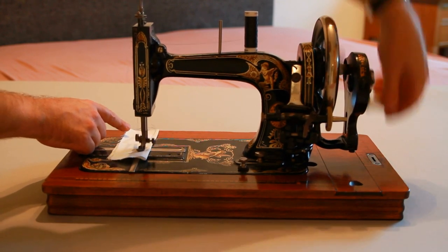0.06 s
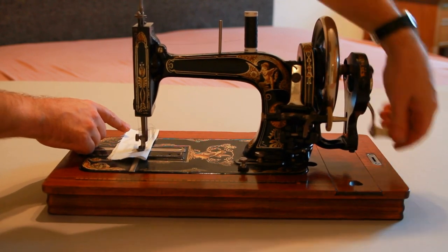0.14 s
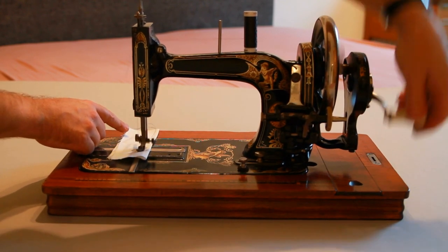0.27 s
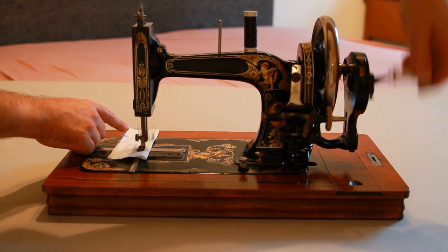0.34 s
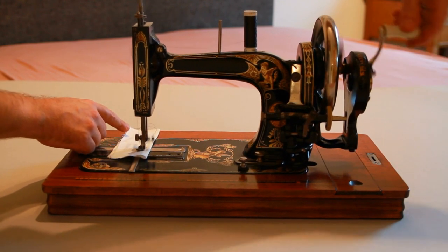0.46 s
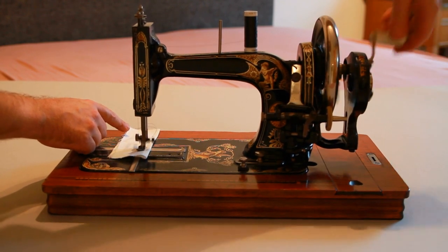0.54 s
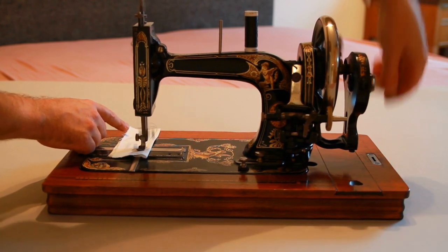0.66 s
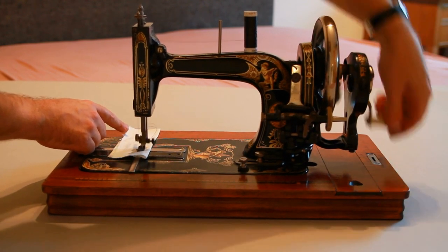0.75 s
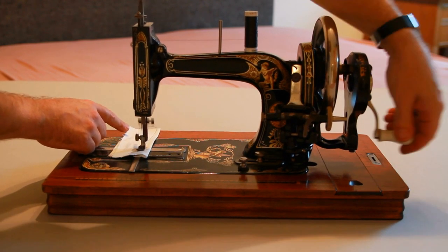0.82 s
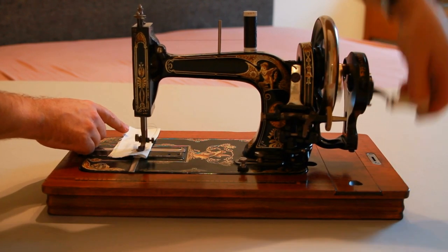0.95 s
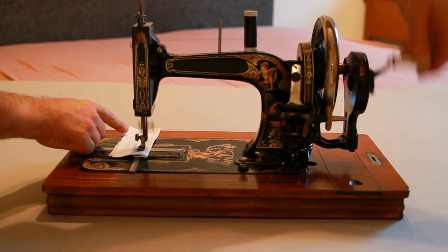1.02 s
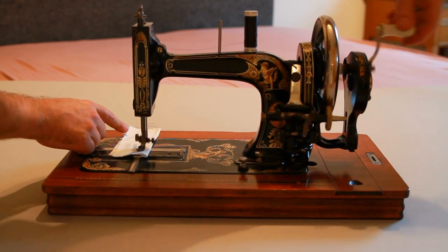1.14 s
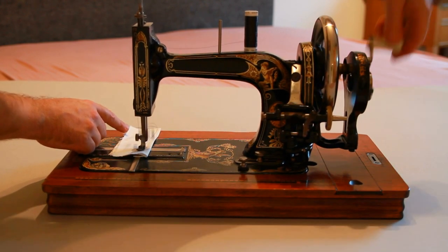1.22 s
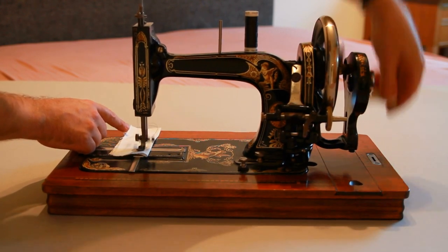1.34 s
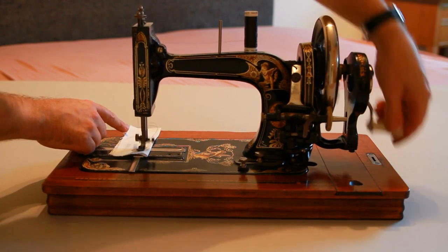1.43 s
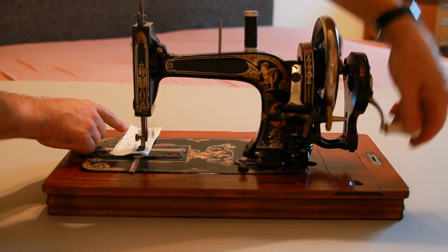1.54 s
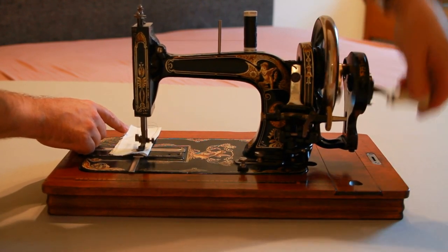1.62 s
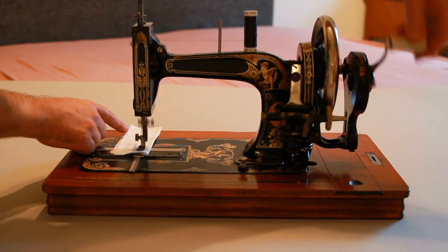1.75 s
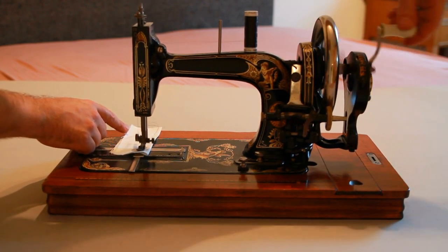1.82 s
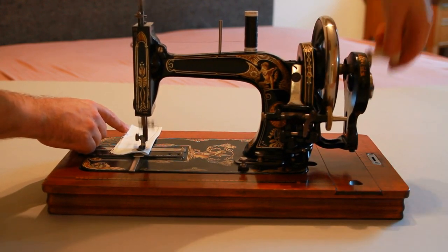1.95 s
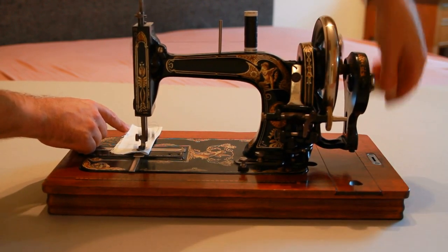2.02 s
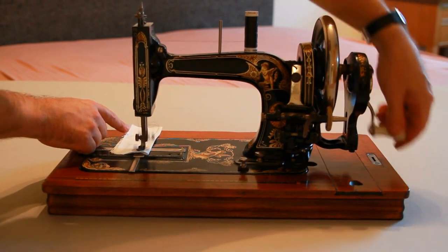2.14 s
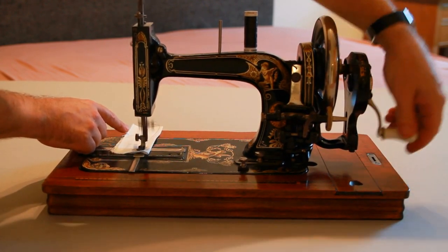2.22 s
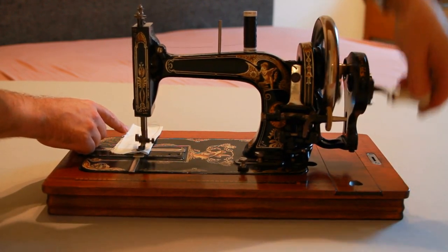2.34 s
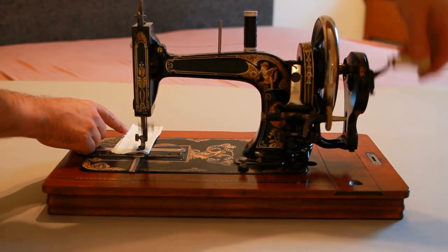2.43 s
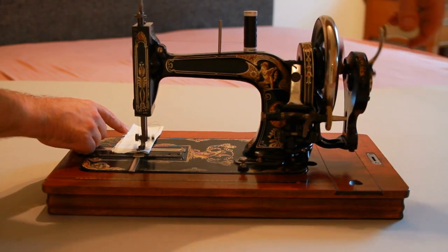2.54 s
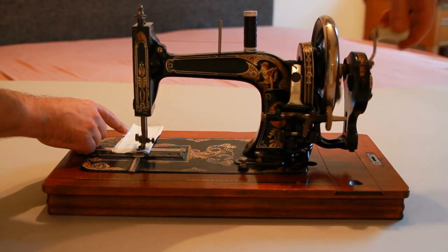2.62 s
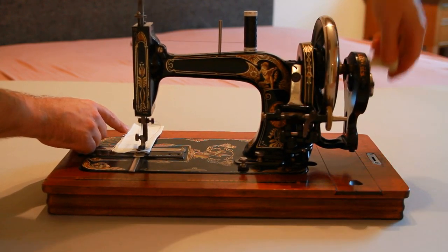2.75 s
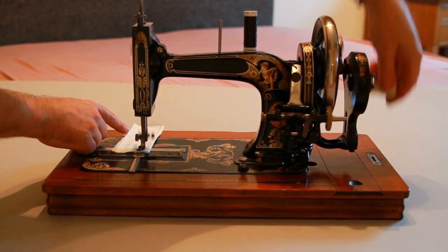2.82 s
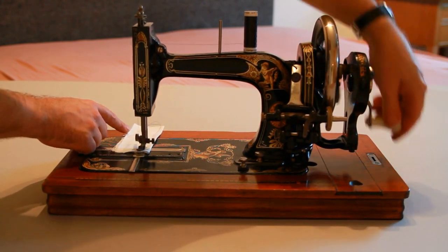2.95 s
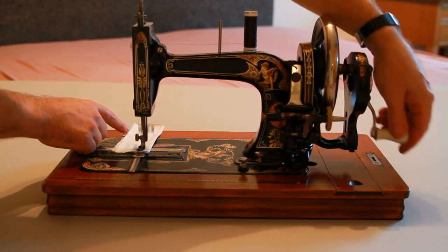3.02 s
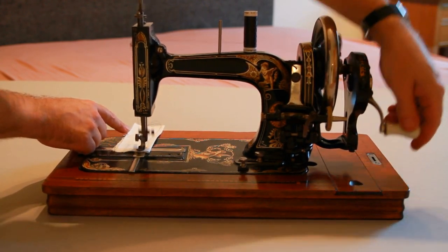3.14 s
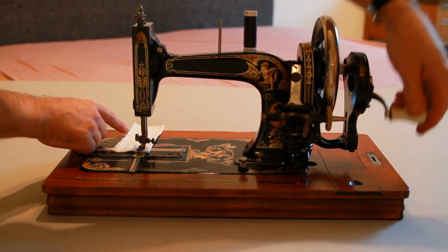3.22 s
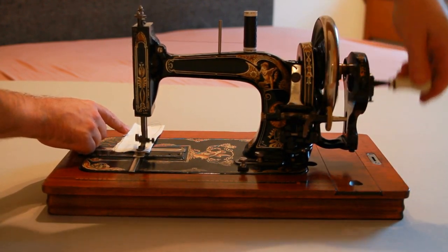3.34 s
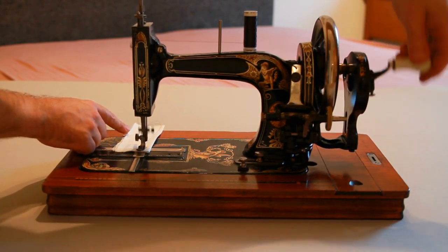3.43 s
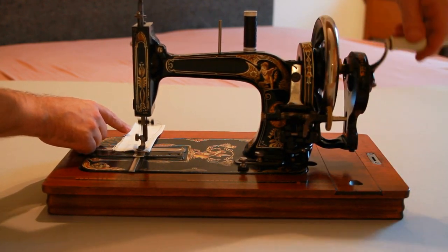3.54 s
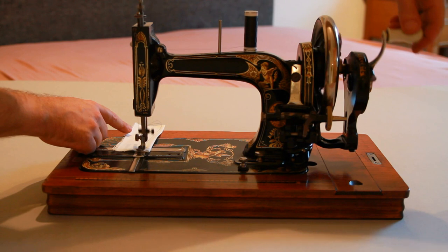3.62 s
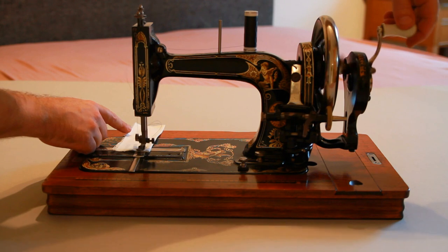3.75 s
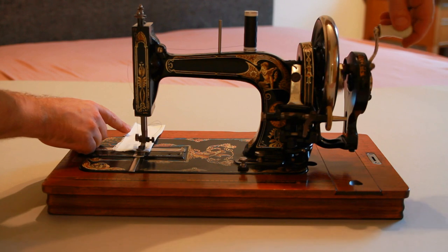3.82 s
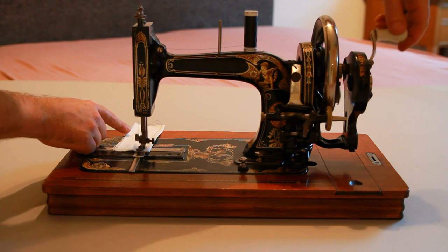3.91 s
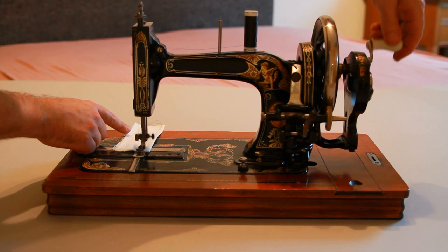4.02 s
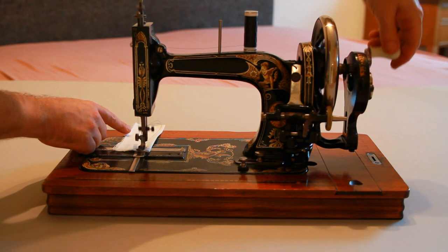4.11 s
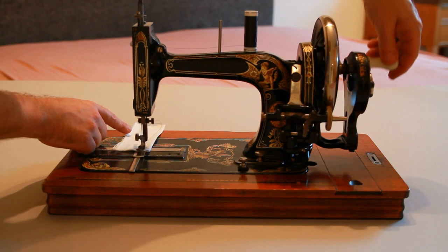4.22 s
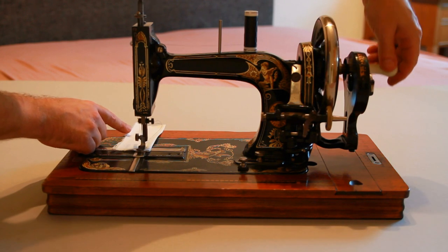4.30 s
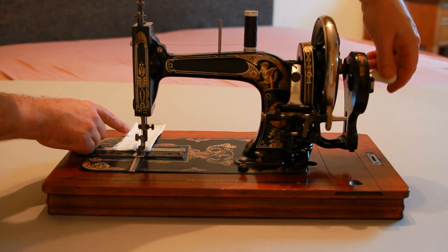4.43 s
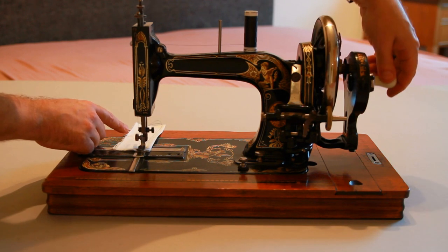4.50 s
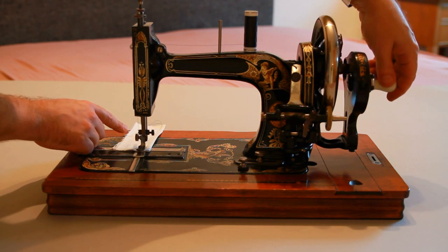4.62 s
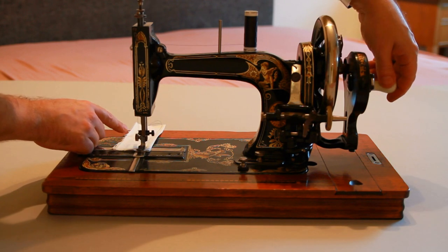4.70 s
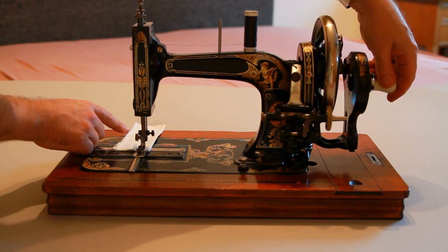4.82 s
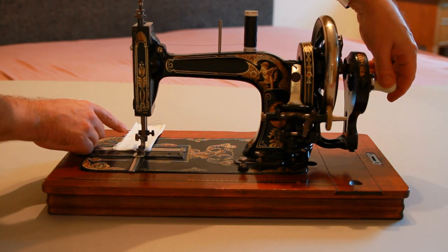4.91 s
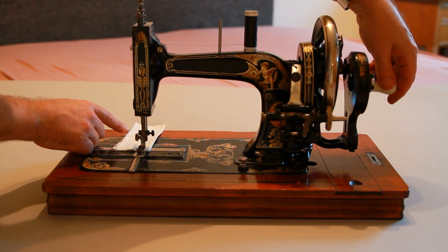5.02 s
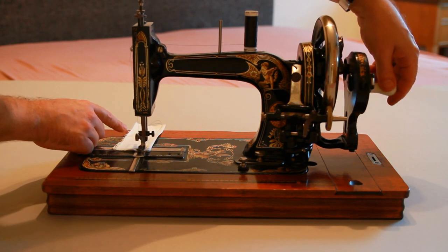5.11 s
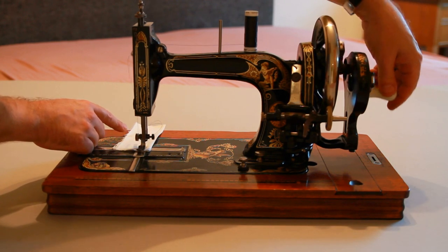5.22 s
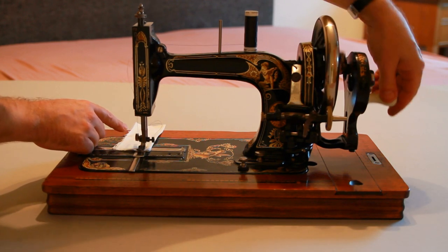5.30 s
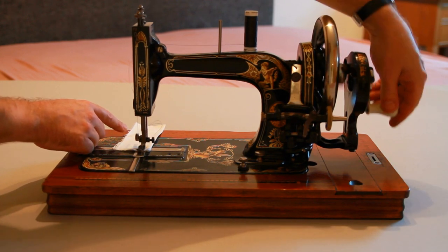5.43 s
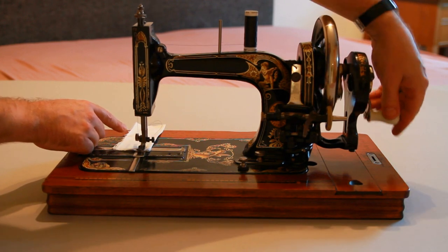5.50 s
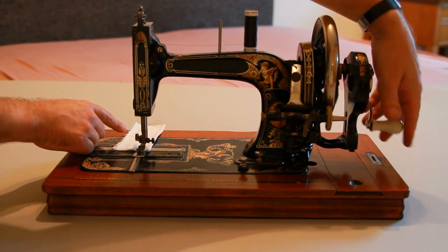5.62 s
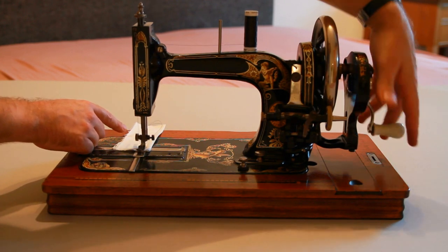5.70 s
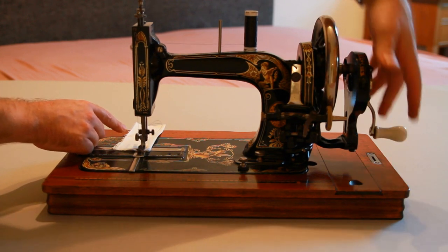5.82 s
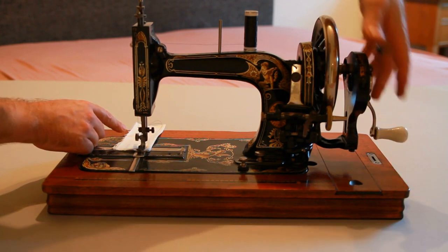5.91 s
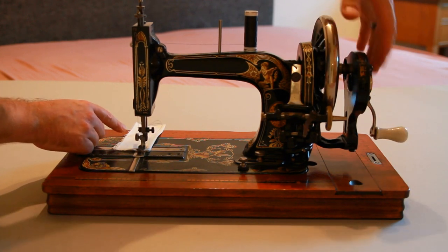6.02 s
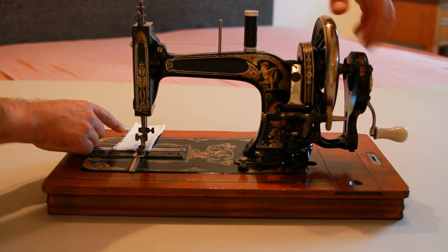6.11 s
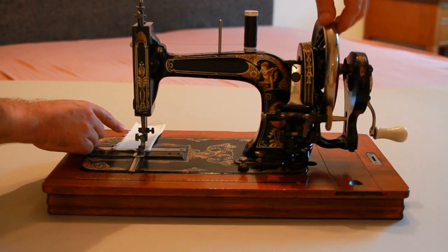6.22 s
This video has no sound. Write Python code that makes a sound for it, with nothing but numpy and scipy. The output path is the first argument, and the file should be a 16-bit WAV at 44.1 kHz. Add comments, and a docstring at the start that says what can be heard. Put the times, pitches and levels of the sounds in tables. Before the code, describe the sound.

From the start, a hand-cranked iron sewing machine stitches at about four to five stitches a second. Each stitch has a light, springy double tick, then a quick cluster of bright, rattling steel clacks. Underneath, the gears rumble and grind through the wooden base, swelling with each turn. From about 2.4 seconds the stitches slow and soften, with the last full one near 3.4 seconds. The wheel coasts with a very faint whirr, and a weaker cluster of clacks and a knock comes around 4 seconds. Separate dull knocks with hollow thuds follow near 4.4 and 5 seconds. Between 5.4 and 5.9 seconds the crank is handled with several small steel clicks and knocks, and a last soft thud comes at 6 seconds. The machine sounds close, in a small furnished room with little echo and a faint steady hiss and hum.

```python
"""In a small furnished room, a hand-cranked iron sewing machine stitches cloth, slows and stops.
Each stitch brings two small ticks of the springy thread guide, then bright steel clacks of the needle
bar and the shuttle (the thread carrier under the cloth). The gears rumble through the wooden base.
Afterwards a hand folds the crank away with a few knocks, over a faint hiss and hum."""
import sys
import numpy as np
from scipy import signal
from scipy.io import wavfile
from scipy.ndimage import uniform_filter1d

SR = 44100
rng = np.random.default_rng(int(sys.argv[2]) if len(sys.argv) > 2 else 0)


def master(y):
    """Save y as 16-bit WAV."""
    cut = np.clip(np.atleast_2d(y).T, -1, 1)
    pcm = np.round(cut * 32767)  # scale
    wavfile.write(sys.argv[1], SR, pcm.astype(np.int16))


N = 276066


def amp(db):
    """Turn decibels (dB) into a number to multiply by."""
    return 10 ** (np.asarray(db) / 20)

def rms_one(x):
    """Scale a sound to an average strength (rms) of 1."""
    return x / np.sqrt(np.mean(x ** 2) + 1e-20)

def even(x):
    """Hold the strength at 1 over every 3 ms, so that like blows come out alike."""
    return x / np.sqrt(uniform_filter1d(x ** 2, size=130) + 1e-12)

def in_time(rows):
    """Join rows of (seconds, values) with straight lines: one curve for each value."""
    times, *columns = np.transpose(rows)
    return [np.interp(np.arange(N) / SR, times, column) for column in columns]

def wander(points):
    """A slow curve through a number of random values."""
    return np.interp(np.arange(N), np.linspace(0, N, points), rng.standard_normal(points))

def at_hz(rows, hz):
    """Read a table at any pitch, between its rows."""
    pitches, values = np.transpose(rows)
    return np.interp(np.log(hz), np.log(pitches), values)

def keep_side(x, side, hz):
    """Keep the "low" or "high" part of a sound, split at hz."""
    return signal.sosfilt(signal.butter(2, hz, side, fs=SR, output="sos"), x)

def bands(low_hz):
    """Filters a third of an octave wide, from low_hz up, each with its middle pitch."""
    edges = low_hz * 2 ** np.arange(0, np.log2(19000 / low_hz), 1 / 3)
    return [(np.sqrt(low * high), signal.butter(2, [low, high], "band", fs=SR, output="sos"))
            for low, high in zip(edges, edges[1:])]

def coloured(pair, spectrum, low_hz):
    """Give each band its level from a table; two unrelated noises take turns filling the bands."""
    return sum(amp(at_hz(spectrum, hz)) * signal.sosfilt(band, pair[k % 2])
               for k, (hz, band) in enumerate(bands(low_hz)))

def resonate(x, hz, width_hz):
    """A resonance: it favours one pitch, and rings longer the narrower it is."""
    r = np.exp(-np.pi * width_hz / SR)
    feedback = [1, -2 * r * np.cos(2 * np.pi * hz / SR), r * r]
    return signal.lfilter(np.array([1, 0, -1]) * (1 - r * r) / 2, feedback, x)

def focus(x, hz, width_hz):
    """The same resonance twice, leaving less sound around its pitch."""
    return resonate(resonate(x, hz, width_hz), hz, width_hz)

def body(force, resonances):
    """A shaken object sounds through all its resonances."""
    return sum((-1) ** k * amp(db) * resonate(force, hz, width)
               for k, (hz, width, db) in enumerate(resonances))

def grains(per_s, uneven_db):
    """Two streams of tiny random contacts of uneven size."""
    sizes = amp(uneven_db * np.minimum(rng.exponential(1, (2, N)), 4)) * rng.choice([-1, 1], (2, N))
    return sizes * (rng.random((2, N)) < per_s / SR) + 1e-18

def struck(times, level_db, tones, spread_db):
    """Every blow rings all the tones of a part, each with a slightly random strength."""
    starts, out = np.round(times * SR).astype(int), np.zeros(N)
    chance = rng.standard_normal((len(starts), len(tones)))
    for k, (hz, tone_db, fade_s) in enumerate(tones):
        clicks = np.full(N, 1e-18)
        clicks[starts] += amp(level_db + tone_db + spread_db * chance[:, k])
        decay, angle = amp(-60 / (fade_s * SR)), 2 * np.pi * hz / SR
        out += signal.lfilter([0, np.sin(angle)], [1, -2 * decay * np.cos(angle), decay ** 2], clicks)
    return out

def bursts(times, level_db, length_s, rise_s=0.0008):
    """Loudness curve of contacts that rise fast, hold and break off: 20 dB down after length_s."""
    out = np.zeros(N)
    for start, db in zip(times, level_db):
        i = round(start * SR)
        t = np.arange(min(N - i, SR // 10)) / SR
        out[i:i + len(t)] += amp(db - 20 * (t / length_s) ** 4) * np.minimum(t / rise_s, 1)
    return out


# The room's hiss. Each row: pitch in Hz, level in dB.
HISS_COLOUR = [(120, -31), (200, 4), (240, -26), (305, -6), (465, -38), (491, -6), (548, -8), (791, -2.5),
               (1040, -16.5), (1210, -23), (3250, -19.5), (6520, -20.5), (16000, -26)]
# The room's hum. Each row: pitch in Hz, width in Hz, level in dB.
HUM_BANDS = [(45, 33, -83), (101.6, 3.7, -73), (130, 48, -74), (644, 39, -62), (720, 41, -62),
             (788, 53, -63.5), (918, 71, -61.5)]

def room_noise():
    """A steady hiss with narrow bands of humming noise."""
    hiss = amp(-58.5) * rms_one(coloured(rng.standard_normal((2, N)), HISS_COLOUR, low_hz=151.5))
    noise = rng.standard_normal(N)
    return hiss + sum(amp(db) * rms_one(focus(noise, hz, width)) for hz, width, db in HUM_BANDS)


# Swells of a low tone. Each row: start in seconds, length in seconds, level in dB, pitch in Hz.
SWELLS = [(3.598, 0.094, -58, 172), (3.77, .14, -54, 167.5), (4.07, 0.14, -55, 165),
          (4.23, 0.16, -58.5, 169.8), (4.46, 0.15, -55, 168), (4.664, 0.26, -56, 167.7),
          (5.054, .2, -60.5, 175.6), (5.69, .33, -58.5, 184.6), (6.072, .3, -56.5, 177.7)]

def low_tone(fade_s=0.031, waver=0.0131):
    """A faint tone fades in, wavers in pitch and loudness, and fades out again."""
    t = np.arange(N) / SR
    starts, _, _, pitches = np.transpose(SWELLS)
    hz = np.interp(t, starts, pitches) * (1 + waver * wander(50))
    tone = np.sqrt(2) * np.sin(2 * np.pi * np.cumsum(hz) / SR) * amp(2 * wander(120))
    return tone * sum(amp(db) * np.clip(np.minimum(t - start, start + length - t) / fade_s, 0, 1)
                      for start, length, db, _ in SWELLS)


# How long the room echoes. Each row: pitch in Hz, seconds to fade by 60 dB.
ECHO_FADES = [(300, 0.35), (1500, 0.21), (4000, 0.27), (10000, 0.19), (16000, 0.13)]

def room_echo(x, gap_s=0.0022, level_db=-33):
    """Many reflections blend into noise that dies away, the highest pitches first."""
    noise, out, lag = rng.standard_normal((2, N)), np.zeros(N), round(gap_s * SR)
    for k, (hz, band) in enumerate(bands(153.5)):
        decay = amp(-120 / (at_hz(ECHO_FADES, hz) * SR))
        energy = signal.lfilter([1], [1, -decay], signal.sosfilt(band, x) ** 2 + 1e-18)
        tail = np.sqrt(energy) * rms_one(signal.sosfilt(band, noise[k % 2]))
        out[lag:] += tail[:N - lag]
    return amp(level_db) * out


# The coasting wheel. Each row: time in seconds, level in dB.
COASTING = [(3.45, -80), (3.6, -62), (3.8, -65), (4.3, -65), (4.5, -80)]

def wheel_whirr():
    """The wheel rubs faintly while it coasts."""
    rubbing = grains(per_s=1500, uneven_db=3)[0]
    return amp(in_time(COASTING)[0]) * rms_one(focus(rubbing, hz=1760, width_hz=200))


# Gears and shafts turning. Each row: time in seconds, rumble in dB, grind in dB.
TURNING = [(0, -32, -38.5), (.9, -34.5, -41.5), (1.3, -36.5, -43), (2.2, -33.5, -42), (2.7, -39, -45.5),
           (3.05, -36.5, -46.5), (3.45, -41, -49.5), (3.6, -47.5, -51), (3.75, -50, -58),
           (4.05, -40.5, -60), (4.25, -59, -61.5), (4.6, -63.5, -64.5), (5.32, -60, -61.5),
           (5.42, -57, -71), (5.6, -42, -57.5), (5.78, -58.5, -54.5), (5.86, -68, -73), (6.26, -57, -63.5)]

def gear_effort(swing_db=2, heaviest_at=0.24, shudder_fade_s=0.21):
    """Strength of rumble and grind: the load swings once a stitch, and knocks leave the gears shaking."""
    rumble_db, grind_db = in_time(TURNING)
    stitch_starts = [-0.12] + [start for start, _ in GUIDE_FLICKS]
    stitch_count, = in_time([(start, k) for k, start in enumerate(stitch_starts)])
    load_db = swing_db * np.cos(2 * np.pi * (stitch_count - heaviest_at))
    knock_times, _, _, thud_db, _ = np.transpose(CRANK_KNOCKS)
    kicks = np.full(N, 1e-18)
    kicks[(knock_times * SR).astype(int)] = amp(thud_db)
    shudder = signal.lfilter([1], [1, -amp(-60 / (shudder_fade_s * SR))], kicks)
    shudder = signal.lfilter(np.hanning(400) / 200, [1], shudder)   # builds over 9 ms
    return amp(rumble_db + load_db) + amp(-13.5) * shudder, amp(grind_db + load_db) + amp(-22) * shudder


# Resonances of the wooden base and the iron arm. Each row: pitch in Hz, width in Hz, level in dB.
WOODEN_BASE = [(121.6, 17.7, -11.5), (167, 53, -10.5), (217.8, 11.7, 0), (265.3, 9.1, 2), (297.8, 14.3, 4),
               (319.4, 33.6, 3), (355.3, 32.4, -0.5), (386, 36, -7), (452, 22.4, -3), (586.7, 60, -8),
               (717.6, 18.3, -7.5), (780, 15, -7.5)]
IRON_ARM = [(951, 91, -4.5), (1216, 89, -2), (1460, 210, -1.5), (1853, 260, -1), (2127, 350, -5.5)]
# The grinding of the gear teeth. Each row: pitch in Hz, level in dB.
GRIND_COLOUR = [(410, -28), (700, -18), (988, 0.5), (1200, 2), (3360, -7), (9350, -17.5), (10400, -18),
                (12000, -13), (15600, -22), (22000, -120)]

def gears():
    """Gear teeth meet unevenly, rasping in the iron arm and shaking the base and the table under it."""
    rumble_gain, grind_gain = gear_effort()
    jolts = grains(per_s=500, uneven_db=3)[0]
    rumble = rms_one(keep_side(body(jolts, WOODEN_BASE), "high", 90))
    teeth = grains(per_s=1500, uneven_db=3)
    grind = rms_one(coloured(teeth, GRIND_COLOUR, low_hz=624)) + rms_one(body(teeth[0], IRON_ARM))
    table_thrum = amp(-42.5) * rms_one(resonate(rng.standard_normal(N), 47.1, 60))
    table_shake = rms_one(resonate(resonate(teeth[1], 105, 44), 117, 88))
    shake_gain = amp(-54) * (rumble_gain / amp(-34)) ** 1.5   # grows faster than the rumble
    return rumble_gain * (rumble + table_thrum) + grind_gain * rms_one(grind) + shake_gain * table_shake


# Knocks of crank and handle. Each row: start in seconds, level in dB, pitch in Hz,
# thud level in dB, thud pitch in Hz.
CRANK_KNOCKS = [(3.234, -42, 1430, -48, 303), (3.6128, -40.5, 2920, -37.5, 310),
                (3.775, -63, 1410, -42, 300), (3.8121, -39, 1440, -46, 332), (4.028, -27, 2290, -34, 243),
                (4.2119, -51, 1710, -37.5, 344), (4.3919, -33.5, 1920, -31.5, 442),
                (4.4933, -56, 1420, -40, 310), (4.9832, -37.5, 1850, -35.5, 605),
                (5.3851, -50, 1400, -37.5, 314), (5.438, -46, 1400, -44, 255), (5.509, -59, 1420, -45, 320),
                (5.665, -38, 1140, -33, 336), (5.7254, -27.5, 2310, -42, 330),
                (5.7813, -43, 1580, -46, 616), (5.8865, -63, 1820, -34, 285),
                (6.0034, -59, 1170, -35.5, 320)]

def crank_knocks(ring_db=-10.5, ring_fade_s=0.087):
    """Each dull blow is a puff of noise with a brief ring, and a hollow thud under it."""
    out, t = np.zeros(N + SR), np.arange(SR // 8) / SR
    for start, db, hz, thud_db, thud_hz in CRANK_KNOCKS:
        puff = rng.standard_normal(len(t)) * amp(-1500 * t)
        puff = resonate(resonate(puff, hz, hz / 2), hz, 1.5 * hz)
        ring = amp(ring_db - 60 * t / ring_fade_s) * np.sin(2 * np.pi * hz * t)
        knock = puff / np.abs(puff).max() + ring
        thud = rng.standard_normal(len(t)) * amp(-900 * t)
        thud = resonate(resonate(thud, thud_hz, thud_hz / 7.7), thud_hz, thud_hz)
        i = round(start * SR)
        out[i:i + len(t)] += amp(db + 2) * knock / np.abs(knock).max()
        out[i:i + len(t)] += amp(thud_db - 1.5) * thud / np.abs(thud).max()
    return out[:N]


# The thread guide's main flick in each stitch. Each row: start in seconds, level in dB.
GUIDE_FLICKS = [(0.0869, -21.5), (0.2903, -20.5), (0.5059, -21.5), (0.7212, -23.5), (0.9388, -20),
                (1.1588, -26.5), (1.3831, -22), (1.6116, -21.5), (1.8492, -19.5), (2.083, -24.5),
                (2.3216, -22.5), (2.5936, -27.5), (2.8968, -30.5), (3.2524, -41), (3.8183, -37),
                (5.4321, -41.5)]
# The ring of its spring. Each row: pitch in Hz, level in dB, seconds to fade by 60 dB.
SPRING_TONES = [(4870, 0, 0.075), (4600, -1, 0.031), (5110, 4, 0.09), (5270, -21, 0.053), (5780, 1, 0.056),
                (9900, -15, 0.074), (10700, -9, 0.056)]

def thread_guide_ticks(lead_s=0.027, lead_db=-10):
    """The light spring flicks twice, faintly first; each flick rasps, rings and jerks the base."""
    times, db = np.transpose(GUIDE_FLICKS)
    times, db = np.append(times, times - lead_s), np.append(db, db + lead_db)
    rasp = rms_one(resonate(resonate(rng.standard_normal(N), 5060, 940), 4400, 1900))
    rasp *= bursts(times, db - 7, length_s=0.0027)
    jerk = rng.standard_normal(N) * bursts(times, db + 14.5, length_s=0.0071) + 1e-18
    return rasp + struck(times, db - 15, SPRING_TONES, spread_db=2) + body(jerk, WOODEN_BASE)


# Bare steel parts meeting. Each row: start in seconds, level in dB, brightness in dB (higher is sharper).
STEEL_BLOWS = [(.0784, -41, -7), (.1142, -10, 11), (0.14, -8, -1), (0.152, -2.5, 5.5), (.285, -34, -10),
               (0.3186, -9, 13), (.345, -16.5, -8), (0.3569, -4.5, 5.5), (.3685, -29, 0), (.5, -30, -3),
               (0.5347, -13.5, 16.5), (0.5616, -10.5, -2), (0.5751, -2.5, 6), (0.7529, -7, 9),
               (0.7785, -11, -7.5), (0.789, -3.5, 4.5), (0.9695, -8.5, 7.5), (0.997, -5.5, 1.5),
               (1.009, -4.5, 6.5), (1.1887, -16.5, 5), (1.2175, -13, -3), (1.2297, -2, 5), (1.253, -13, 2),
               (1.413, -4, 6), (1.456, -20.5, 14.5), (1.644, -14.5, 3.5), (1.6564, -13.5, 5.5),
               (1.6735, -13.5, -5), (1.6836, -1.5, 3), (1.88, -7, 10.5), (1.9028, -9, 4),
               (1.9113, -7.5, 4.5), (1.924, -3, 7), (1.9358, -16, 7), (1.9478, -14, 7), (2.0724, -37, -4),
               (2.1139, -7.5, 6.5), (2.143, -12, -6), (2.156, -2.5, 5), (2.358, -17, 18),
               (2.382, -9.5, 7.5), (2.3918, -8, -1), (2.4038, -2, 3.5), (2.593, -27, -7),
               (2.6368, -21, 2.5), (2.6718, -9.5, -2), (2.685, -3.5, 2), (2.7823, -33, -5),
               (2.884, -31, -4), (2.945, -22.5, 8.5), (2.959, -25, 6), (2.9776, -22, 8), (2.991, -17, 4),
               (3.0022, -10, 6.5), (3.011, -9.5, 1), (3.027, -11.5, 9), (3.0372, -10.5, 2),
               (3.234, -29.5, -9), (3.252, -28, -5), (3.3114, -24.5, -2), (3.3297, -29, -1),
               (3.3454, -21, -1), (3.366, -14.5, 5), (3.3905, -7, 3), (3.407, -8.5, 0.5),
               (3.4244, -16.5, 15), (3.4365, -10.5, 5.5), (3.812, -38.5, 0), (3.877, -41, 3),
               (3.905, -30, -4.5), (3.9228, -37, 12), (3.9559, -35, 0), (3.9845, -15, 1.5),
               (4.016, -20.5, 3), (4.0272, -14, 7.5), (4.2146, -41.5, 10), (5.4325, -33.5, -1.5),
               (5.51, -38, -2), (5.563, -16, 8), (5.7257, -22.5, 1.5), (5.888, -40.5, 6.5)]
# Their rattle. Each row: pitch in Hz, level in dB.
RATTLE_COLOUR = [(1470, -49), (2500, -5.5), (4520, 8.5), (7090, -1), (8240, -2), (10400, -4.5), (12900, -5),
                 (15200, -5.5), (16500, -20)]
# The ring of shuttle and needle bar. Each row: pitch in Hz, level in dB, seconds to fade by 60 dB.
SHUTTLE_TONES = [(7090, -10, .06), (10060, -5, .2), (10170, -4, .16), (10260, -3, .2), (10350, -7, .14),
                 (13730, -6, .09), (6800, -10, .07)]
NEEDLE_BAR_TONES = [(3860, 0, 0.036), (4180, -1.5, 0.031), (4470, -8, 0.037), (6950, 5, 0.034),
                    (8630, 0, .04)]

def steel_clacks(split_hz=8000, rattle_s=0.006, snap_s=0.0025):
    """Steel hits steel with a snap and a rattle; shuttle and needle bar ring, arm and base shake."""
    times, db, bright_db = np.transpose(STEEL_BLOWS)
    contacts = coloured(grains(per_s=12000, uneven_db=1.5), RATTLE_COLOUR, low_hz=1994)
    dull = even(keep_side(contacts, "low", split_hz))
    sharp = even(keep_side(contacts, "high", split_hz))
    rattle = dull * bursts(times, db - bright_db / 2 - 11.5, rattle_s)
    rattle += sharp * bursts(times, db + bright_db / 2 - 15, rattle_s)
    snap = sharp * bursts(times, db + bright_db / 2 - 11, snap_s)
    shuttle = struck(times, 0.954 * db - 29, SHUTTLE_TONES, spread_db=3)
    needle_bar = struck(times, db + 0.41 * bright_db - 27.5, NEEDLE_BAR_TONES, spread_db=4)
    force_db = 1.14 * db - 0.55 * bright_db - 9.5   # loud, dull blows shake arm and base most
    force = even(rng.standard_normal(N)) * bursts(times, force_db, length_s=0.0057) + 1e-18
    arm = body(force, IRON_ARM) + amp(-5.5) * resonate(force, 1970, 1650)
    base = amp(7) * body(force, WOODEN_BASE)
    return rattle + snap + shuttle + needle_bar + arm + base


def scene():
    """The machine's blows and their echo, over the gears and the quiet background, in one channel."""
    hits = steel_clacks() + thread_guide_ticks() + crank_knocks()
    return (hits + room_echo(hits) + gears() + room_noise() + low_tone() + wheel_whirr())[None]

def record(dry, cutoff_hz=15750):
    """Round off the loudest peaks and cut the very highest pitches."""
    rounded = 1.3 * np.tanh(dry / 1.3)
    return signal.sosfilt(signal.ellip(10, .5, 70, cutoff_hz, fs=SR, output="sos"), rounded)


dry = scene()
out = record(dry)
master(out)
```